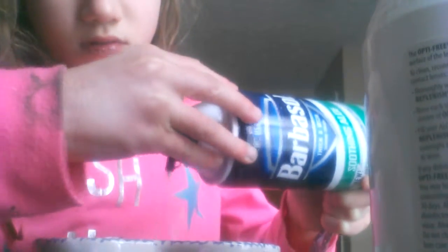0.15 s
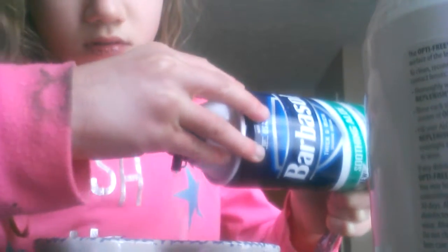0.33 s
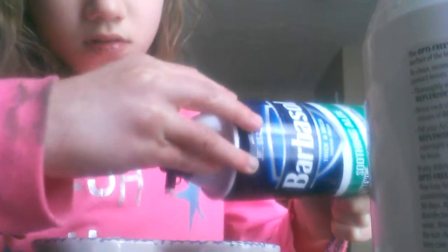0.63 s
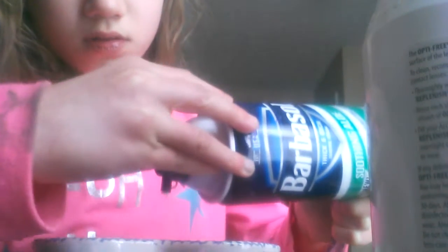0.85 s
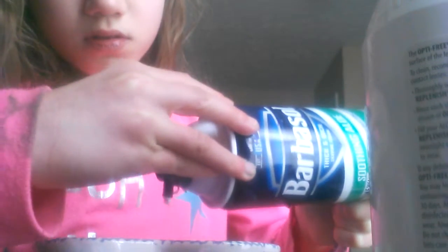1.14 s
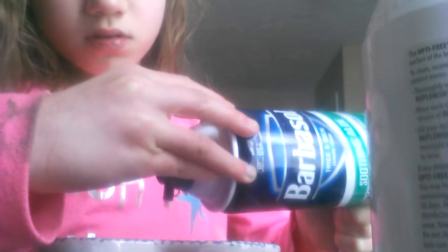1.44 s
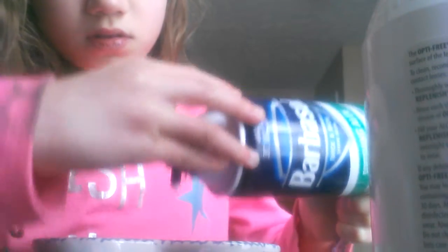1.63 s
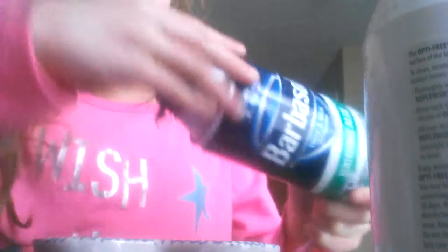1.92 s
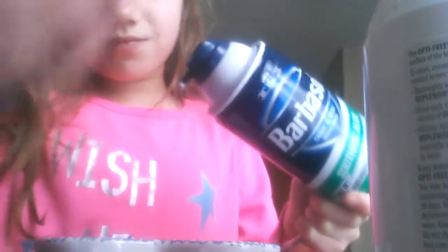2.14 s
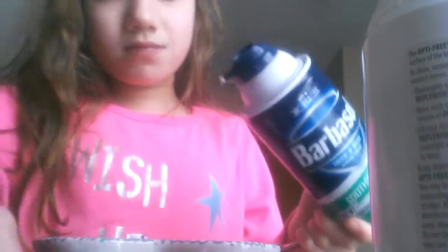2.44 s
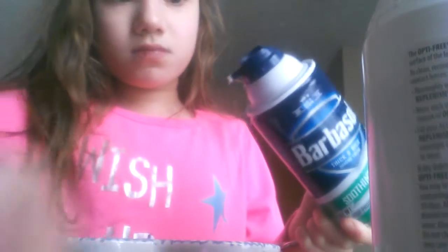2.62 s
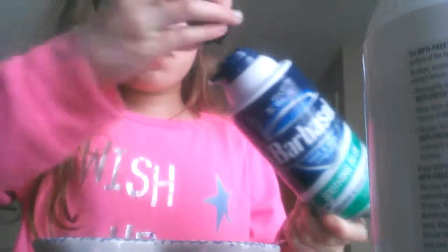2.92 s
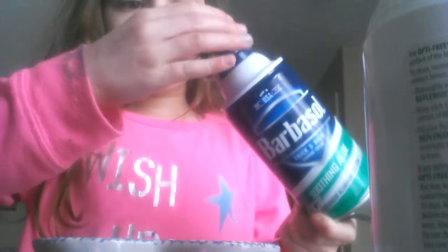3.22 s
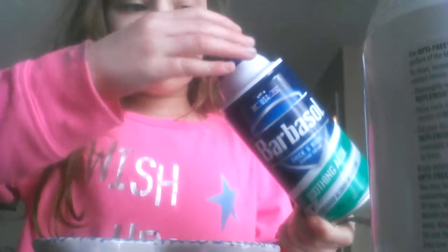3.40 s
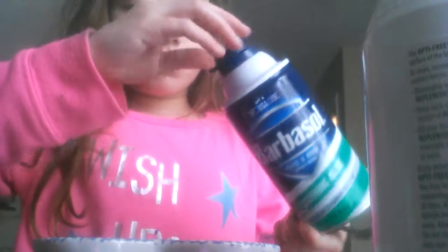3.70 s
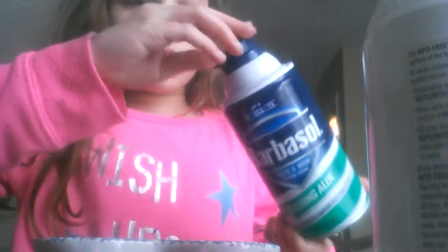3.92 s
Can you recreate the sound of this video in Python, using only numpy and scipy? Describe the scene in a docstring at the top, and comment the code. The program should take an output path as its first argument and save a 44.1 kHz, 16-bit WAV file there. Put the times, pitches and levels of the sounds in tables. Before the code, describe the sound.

Close to the microphone in a quiet home, a can of shaving foam sprays for under two seconds, its loud hiss breaking up into spits and small plops before it cuts off. The rest is much quieter: scattered fingertip clicks and soft rubbing on the plastic cap over a faint house rumble, with a dog woofing twice, short and dull, behind a wall.

```python
"""A hand brushes a can over the low rumble of a house, then shaving foam hisses into a bowl.
The jet sputters more and more as gas breaks through the foam, and stops; fingers then tick on the
plastic cap. Twice a dog gives a muffled woof in another room.
The can is close to a two-port microphone in a living room."""
import sys
import numpy as np
from scipy import signal
from scipy.fft import rfft, irfft, next_fast_len
from scipy.io import wavfile

SR = 44100
rng = np.random.default_rng(int(sys.argv[2]) if len(sys.argv) > 2 else 0)


def store_pcm(level_fs):
    """Save levels as 16-bit WAV."""
    pcm = np.round(np.clip(level_fs, -1, 1) * 32767).astype(np.int16)
    wavfile.write(sys.argv[1], SR, np.atleast_2d(pcm).T)


N = 178913
TIME = np.arange(N) / SR
SIZE = next_fast_len(N + SR, real=True)
HZ = np.maximum(np.fft.rfftfreq(SIZE, 1 / SR), 1)


def from_db(db):
    return 10 ** (np.asarray(db) / 20)


def rms(x):
    return np.sqrt(np.mean(x ** 2) + 1e-20)


def in_time(rows):
    seconds, *columns = np.transpose(rows)
    return [np.interp(TIME, seconds, column) for column in columns]


def over_hz(points):
    hz, value = np.transpose(points)
    return np.interp(np.log(HZ), np.log(hz), value)


def through(x, response):
    return irfft(rfft(x, SIZE) * response, SIZE)[..., :N]


def causal(gain):
    """The minimum-phase response with this gain: nothing rings before it is struck."""
    cepstrum = irfft(np.log(gain + 1e-6), SIZE)
    cepstrum[..., 1:SIZE // 2] *= 2
    cepstrum[..., SIZE // 2 + 1:] = 0
    return np.exp(rfft(cepstrum))


def resonant(modes):
    """Gain of steep-sided resonances, each given as centre in Hz, width in Hz, level in dB."""
    peaks = (from_db(db) / (1 + (2 * (HZ - hz) / width) ** 2) for hz, width, db in modes)
    return np.sqrt(sum(peak ** 2 for peak in peaks))


def high_pass(hz, order):
    return 1 / np.sqrt(1 + (hz / HZ) ** (2 * order))


def echoes(t60, delay):
    """Response of dying diffuse reflections, alike at both ports only in the lows; unit power."""
    tail = rng.standard_normal((2, N)) * from_db(-60 * TIME / t60) * (TIME > delay)
    left, other = rfft(tail / np.sqrt(np.sum(tail ** 2, axis=1, keepdims=True)), SIZE)
    apart = high_pass(800, order=2)
    return np.array([left, np.sqrt(1 - apart ** 2) * left + apart * other])


def strikes_at(times, heights):
    out = np.zeros(N)
    out[np.round(np.asarray(times) * SR).astype(int)] = heights
    return out


def fading(strikes, decay_s):
    """Each strike jumps to its height and dies exponentially."""
    return signal.lfilter([1], [1, -np.exp(-1 / (decay_s * SR))], strikes + 1e-18)


def bursts(strikes, decay_s):
    """Each strike sets off a dying burst of noise."""
    return fading(strikes, decay_s) * rng.choice([-1, 1], N)


def crackle(per_s, spread_db, decay_s):
    """Tiny puffs of noise at random moments; rms 1."""
    sizes = from_db(spread_db * np.minimum(rng.exponential(1, N), 3))
    puffs = fading(sizes * (rng.random(N) < per_s / SR), decay_s) * rng.standard_normal(N)
    return puffs / rms(puffs)


# The colour of the room tone. Each row: frequency in Hz, relative level in dB.
ROOM_COLOUR = [(18, -35), (30, -21.5), (145, -6), (291, -13.5), (377, -19), (542, -19), (585, -20.5),
               (1010, -26.5), (1210, -28), (2020, -30), (2760, -31), (4170, -35), (4990, -35), (6140, -37),
               (14400, -33)]
# Its stereo width. Each row: frequency in Hz, side relative to mid in dB.
ROOM_WIDTH = [(60, -5.5), (150, -3), (380, -0.5), (950, 1.5), (2380, 1.5), (5980, 0.5), (15000, -1)]
# The whole bed ducks while the jet sounds. Each row: time in seconds, gain in dB.
ROOM_DUCK = [(0, 8), (.09, -10.5), (.16, -32.5), (1.69, -24.5), (1.78, 4), (4.06, 3)]


def room_tone(air_db, whine_hz, whine_db):
    """The house rumbles and hisses, partly alike at both ports, with a thin high whine on top."""
    mid, side = through(rng.standard_normal((2, N)), from_db(over_hz(ROOM_COLOUR)))
    side = through(side, from_db(over_hz(ROOM_WIDTH)))
    air = np.array([mid + side, mid - side]) / rms(mid)
    whine = through(rng.standard_normal((2, N)), resonant([(whine_hz, 500, 0)]))
    bed = from_db(air_db) * air + from_db(whine_db) * whine / rms(whine)
    return bed * from_db(in_time(ROOM_DUCK)[0])


# The hand brushing cap and sleeve. Each row: time in seconds, level in dB.
RUB_LEVEL = [(0, -43.5), (.03, -52.5), (.07, -40.5), (.12, -80.5), (1.9, -83), (2.1, -68), (2.4, -98),
             (2.6, -69), (2.7, -103), (3.1, -75), (3.25, -77), (3.42, -61.5), (3.52, -73), (3.65, -63.5),
             (3.75, -84), (3.95, -96), (4.0, -64.5), (4.06, -77)]


def hand_rub():
    """Fine grains of friction softly excite the plastic cap."""
    friction = from_db(in_time(RUB_LEVEL)[0]) * crackle(per_s=1500, spread_db=0, decay_s=0.0006)
    plastic = resonant([(2300, 900, -2), (4400, 1500, -8.5)])
    return through(friction, causal(plastic / rms(plastic)))


# The valve opens and shuts. Each row: time in seconds, gain in dB.
VALVE_GATE = [(0, -35), (.062, -31), (.066, -19), (.077, -23.5), (.081, -7), (.11, 1), (1.7, 0),
              (1.722, -4.5), (1.74, -17), (1.76, -22.5), (1.82, -39), (1.86, -80)]
# The hiss between sputters. Each row: time in seconds, level in dB, treble in dB before a 9 dB lift.
JET_HISS = [(.1, -17.5, -10), (.13, -19.5, -6.5), (.22, -20, -8), (.3, -20.5, -11.5), (.42, -22, -10),
            (.52, -23, -12.5), (.6, -26, -9.5), (.7, -24, -12), (.77, -25, -14.5), (.82, -23.5, -11),
            (.88, -24.5, -9), (.94, -22, -13), (1.0, -23, -12.5), (1.06, -25.5, -8.5), (1.15, -22.5, -12),
            (1.22, -27.5, -10.5), (1.3, -30, -8), (1.35, -26, -6), (1.38, -17.5, -16), (1.41, -25.5, -13),
            (1.445, -28.5, -10), (1.5, -24, -12), (1.56, -27.5, -7), (1.615, -29, -9), (1.64, -20, -11),
            (1.665, -30, -7.5), (1.7, -28, -8)]
# The foam's texture. Each row: time in seconds, spits relative to hiss in dB, low gush gain in dB.
FOAM_TEXTURE = [(.1, -11, 7), (.3, -6, 3.5), (.5, -3.5, 1), (.75, -3, 0), (1.1, -1, -4), (1.7, -1.5, 0.5)]


def foam_jet():
    """The jet hisses and small bubbles tear in it. Returns nozzle core, left plume and right plume."""
    level_db, treble_db = in_time(JET_HISS)
    spit_db, gush_db = in_time(FOAM_TEXTURE)
    flow = from_db(level_db + in_time(VALVE_GATE)[0] - 1)
    spit_gain = from_db(spit_db)
    hiss = rng.standard_normal(N)
    spits = spit_gain * crackle(per_s=460, spread_db=4.5, decay_s=0.0005)
    core = (hiss + spits) / np.sqrt(1 + spit_gain ** 2)
    # the spreading plume fizzes all over, so each port hears a different part of it
    plume = from_db(-4) * rng.standard_normal((2, N))
    jet = flow * np.vstack([core, plume])
    # a faster jet is brighter, thick foam is fuller
    treble = through(jet, high_pass(6500, order=4))
    lows = through(jet, 1 - high_pass(900, order=3) ** 2)
    return jet + treble * (from_db(treble_db + 9) - 1) + lows * (from_db(gush_db) - 1)


# The heaviest gobs of foam. Each row: start in seconds, level in dB.
GOBS = [(.08, -39), (.625, -50), (1.337, -52.5), (1.513, -48)]


def gob_thuds(decay_s, centre_hz):
    """A heavy gob pushes a brief low puff of air."""
    starts, db = np.transpose(GOBS)
    low_band = resonant([(centre_hz, 220, 0)]) * high_pass(95, order=2)
    air = through(rng.standard_normal((2, N)), low_band)
    return fading(strikes_at(starts, from_db(db)), decay_s) * air / rms(air)


# Gas breaking through. Each row: start in seconds, puff strength in dB, plop send in dB.
GAS_POCKETS = [(0.12, -3, -10), (0.185, -9.5, -8), (0.222, -6, -2.5), (0.265, -2.5, -1),
               (0.437, -8.5, -4.5), (.457, -3.5, -10.5), (0.528, -12, 4), (0.61, -11.5, -17),
               (.626, -0.5, -8), (.635, -13.5, -0.5), (.648, -13, -21.5), (0.67, -18, -9), (.734, -3, -23),
               (0.772, -7.5, -4), (0.806, -3, -8.5), (.842, -9, -20), (.888, -6.5, -25.5),
               (.912, -5.5, -11), (.93, -1.5, -20), (0.957, -7, -14), (0.999, -3.5, -20.5),
               (1.012, -2.5, -25.5), (1.041, -4, -21), (1.08, -7, -6.5), (1.088, -2, -8),
               (1.132, -7.5, -16), (1.153, -6, -19), (1.187, -12.5, -11), (1.199, -11.5, 3.5),
               (1.233, -12, -0.5), (1.254, -6.5, -7), (1.272, -11.5, -6), (1.323, -6, -4), (1.338, -5, -1),
               (1.367, -5, -19.5), (1.374, -4, -21.5), (1.399, -13.5, -3.5), (1.481, -9, -8),
               (1.514, -1, -6.5), (1.546, -14.5, 1), (1.585, -8, -4), (1.632, -3, -16), (1.643, -15, -15)]


def sputters(puff_s, plop_hz, plop_s):
    """Large gas pockets burst at the nozzle: a sharp puff and a duller plop of foam."""
    starts, puff_db, plop_db = np.transpose(GAS_POCKETS)
    puff = bursts(strikes_at(starts + 0.0014, from_db(puff_db)), puff_s)
    plop = bursts(strikes_at(starts + 0.00079, from_db(puff_db + plop_db)), plop_s)
    return puff + 3 * signal.sosfilt(signal.butter(2, plop_hz, fs=SR, output="sos"), plop)


# The ring of nozzle, bowl and microphone ports.
# Each row: centre in Hz, width in Hz before broadening, left level in dB, right level in dB.
SPRAY_MODES = [(291, 55, -15, -25), (408.4, 47, -8.5, -9), (540, 200, -11.5, -15), (711.5, 180, -14, -12.5),
               (929, 160, -15, -6), (1086, 170, -11.5, -3.5), (1732, 240, -7, -6), (1928, 250, -5, -1.5),
               (2098, 154, -1, 2.5), (2400, 140, -4.5, -9.5), (2761, 280, -2.5, 2), (2950, 220, 0.5, -15.5),
               (3392, 190, -4.5, 2.5), (3702, 240, -0.5, 2), (4180, 380, -8.5, -13.5), (4550, 280, -13, 3),
               (5250, 420, -11.5, -2), (5896, 1200, -12.5, -7), (6686, 440, -11, -2.5),
               (7320, 640, -8, -18), (8170, 260, -8.5, -13.5), (9000, 520, -8, -2.5),
               (10150, 700, -10, -18), (10930, 510, -17, -7.5), (11500, 800, -10.5, -19),
               (13700, 1900, -14.5, -10)]
# How far the right port leads on the direct sound. Each row: frequency in Hz, phase in radians.
RIGHT_LEAD = [(100, 0.5), (600, 1), (1200, 0.33), (2500, 0.84), (3750, .5), (4200, 1.5), (5300, 3.5),
              (5800, 4), (8000, 5), (10000, 1.5), (15000, 3)]


def spray():
    """Jet and sputters leave one nozzle and share its ring and reflections; the plume only rings."""
    jet = foam_jet()
    core, plume = jet[0], jet[1:]
    nozzle = core + from_db(-6.5) * sputters(puff_s=0.0018, plop_hz=1400, plop_s=0.0016)
    hz, width, left_db, right_db = np.transpose(SPRAY_MODES)
    gain = np.array([resonant(zip(hz, 1.2 * width, db)) for db in (left_db, right_db)])
    gain *= high_pass(260, order=6)
    colour, mid_gain = causal(gain), gain.mean(axis=0)
    port_phase = np.exp(1j * over_hz(RIGHT_LEAD) * [[0], [1]])
    direct = gain * causal(mid_gain) / mid_gain * port_phase
    early = from_db(-5) * echoes(t60=0.042, delay=0.00087)
    late = from_db(-9.5) * echoes(t60=0.13, delay=0.011)
    response = direct + colour * (early + late)
    return (through(nozzle, response) + through(plume, colour)) / rms(np.abs(response.mean(axis=0)))


# Fingers land on the cap; body and rim change pitch with the spot touched. Each row: start in seconds,
# an unused peak in dB, body in Hz, body in dB, rim in Hz, rim in dB, snap in dB, knock in dB.
FINGER_TAPS = [(1.9609, -47, 2780, -52, 4320, -70, -74, -66),
               (2.0491, -48.5, 2646, -62, 3610, -56.5, -68, -52.5),
               (2.6229, -33, 2280, -46.5, 3830, -47, -57.5, -51.5),
               (2.8659, -52.5, 1778, -61.5, 5120, -62, -75, -76),
               (3.1282, -42, 2190, -45.5, 4100, -52.5, -61, -65),
               (3.2119, -40, 2236, -47, 4240, -74, -72, -49), (3.3244, -44, 2170, -50, 4970, -56, -71, -65),
               (3.3526, -32, 1800, -53, 4900, -49.5, -63, -64),
               (3.4117, -36, 2380, -44.5, 5120, -48.5, -57, -60),
               (3.4317, -41, 2120, -47.5, 3860, -69, -65, -46.5),
               (3.6027, -24.5, 2220, -34, 4940, -50.5, -50, -49),
               (3.641, -45, 2404, -47, 5120, -72, -71, -56),
               (3.9624, -35.5, 1880, -62, 4320, -39, -66, -59)]
# The two modes that hold their pitch, snap then knock. Each row: centre in Hz, width in Hz.
CAP_MODES = [(8200, 1400), (1150, 750)]


def finger_ticks(body_width_hz, rim_width_hz, drive_db):
    """Each touch strikes four modes of the cap in a balance of its own."""
    snap, knock = CAP_MODES
    out = np.zeros(N)
    for start, _, body_hz, body_db, rim_hz, rim_db, snap_db, knock_db in FINGER_TAPS:
        modes = [(body_hz, body_width_hz, body_db), (rim_hz, rim_width_hz, rim_db),
                 (*snap, snap_db), (*knock, knock_db)]
        strike = strikes_at(start + 0.000984, from_db(drive_db))
        # the sticky finger keeps slipping for a moment after it lands
        slip = from_db(-15.5) * bursts(strike, decay_s=0.0023)
        out += through(strike + slip, causal(resonant(modes)))
    return out


def cap_handling():
    """Ticks and rubbing sit slightly to the right, with short reflections from the room."""
    touch = finger_ticks(body_width_hz=660, rim_width_hz=1250, drive_db=31) + hand_rub()
    early = from_db(-9) * echoes(t60=0.03, delay=0.002)
    late = from_db(-12) * echoes(t60=0.2, delay=0.005)
    return through(touch, 1 + early + late) * from_db([[-1], [1]])


# Two woofs next door. Each row: start in seconds, length in seconds, first pitch in Hz,
# last pitch in Hz, level in dB ahead of wall and hallway.
DOG_CALLS = [(2.041, 0.159, 514.6, 428, -50.5), (3.313, .085, 533, 490, -47.5)]


def dog(roughness, muffle_hz, ring_hz):
    """A short, falling, hoarse call, dulled by the wall and heard mostly as reverberation."""
    throat = resonant([(457, 220, 1.5), (870, 670, -8.5), (1250, 670, -12)])
    out = np.zeros(N)
    for start, length, first_hz, last_hz, db in DOG_CALLS:
        progress = np.clip((TIME - start) / length, 0, 1)
        phase = 2 * np.pi * np.cumsum(first_hz + (last_hz - first_hz) * progress) / SR
        voice = np.sqrt(2) * (np.sin(phase) + 0.15 * np.sin(2 * phase))
        rasp = through(rng.standard_normal(N), throat)
        out += from_db(db) * np.sin(np.pi * progress) * (voice + roughness * rasp / rms(rasp))
    wall = 1 / np.sqrt(1 + (HZ / muffle_hz) ** 4)
    # the hallway rings on, most of all in one low mode
    low_mode = from_db(2.5) * causal(resonant([(ring_hz, 18, 0)]))
    hallway = from_db(-4) * echoes(t60=0.51, delay=0.01) + low_mode
    return through(out, causal(wall) * (0.54 + hallway))


def scene():
    """The can up close, the dog far off, room tone underneath."""
    can = spray() + gob_thuds(decay_s=0.015, centre_hz=172) + cap_handling()
    woofs = dog(roughness=1.0, muffle_hz=1570, ring_hz=449.5)
    return can + woofs + room_tone(air_db=-61, whine_hz=12350, whine_db=-79)


def record(dry):
    """Peaks are rounded and the top is cut steeply."""
    ceiling, cutoff_hz = 1.3, 14550
    rounded = ceiling * np.tanh(dry / ceiling)
    return through(rounded, 1 / np.sqrt(1 + (HZ / cutoff_hz) ** 400))


dry = scene()
out = record(dry)
store_pcm(out)
```